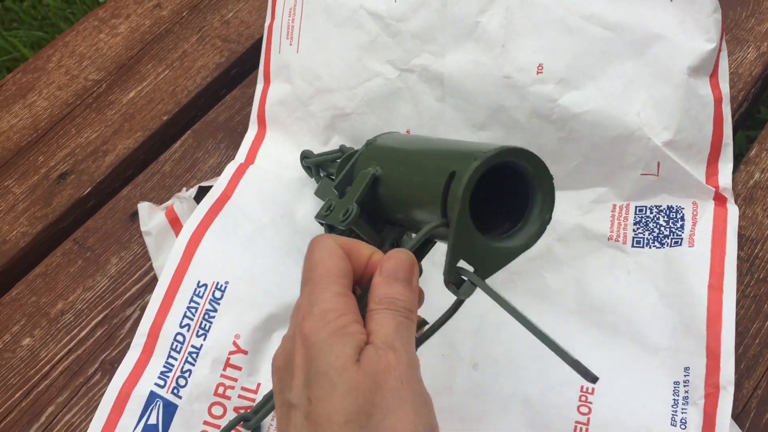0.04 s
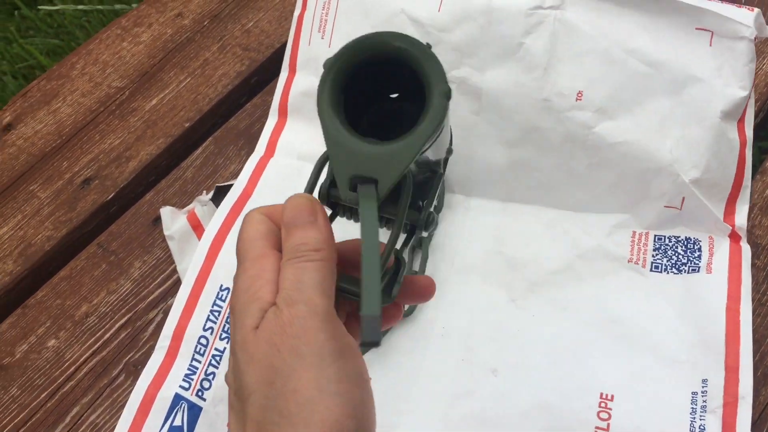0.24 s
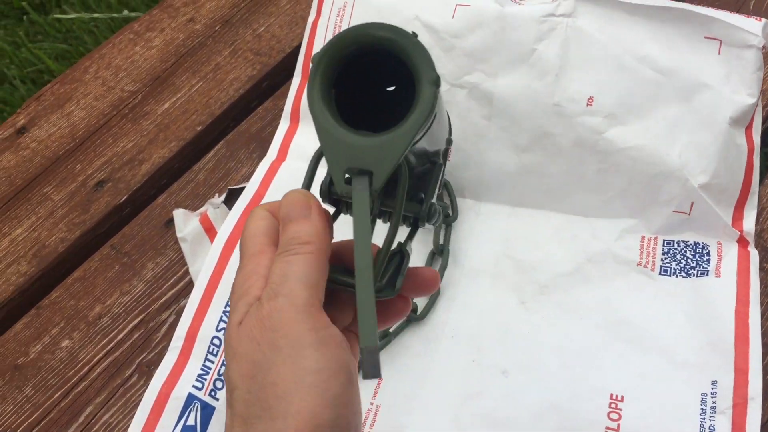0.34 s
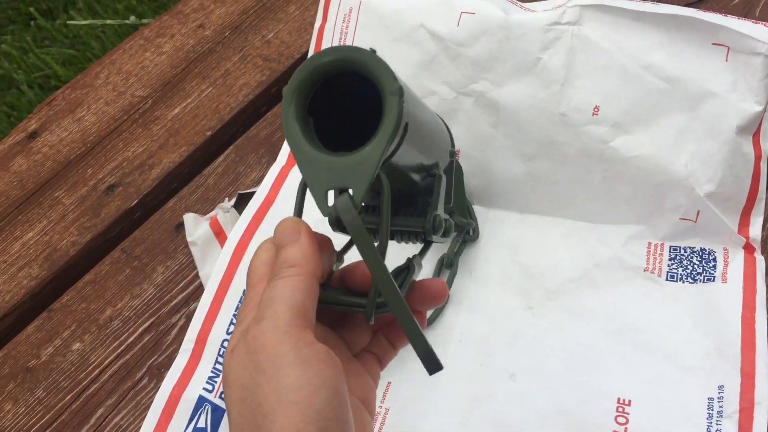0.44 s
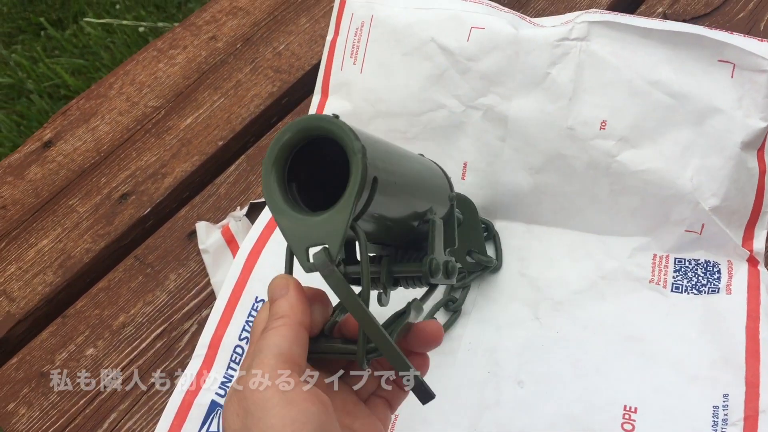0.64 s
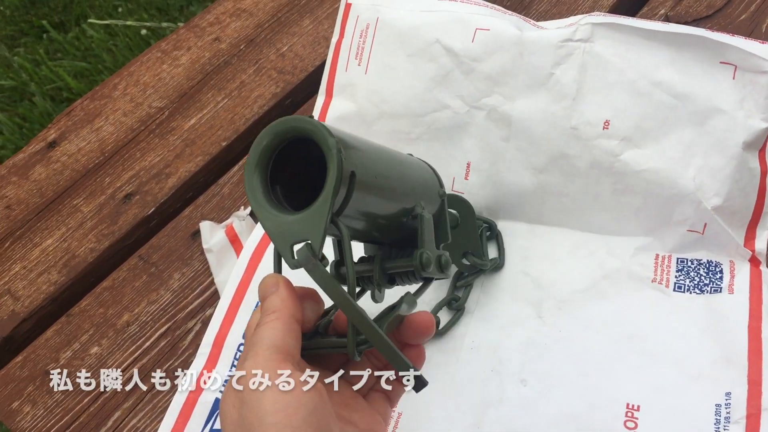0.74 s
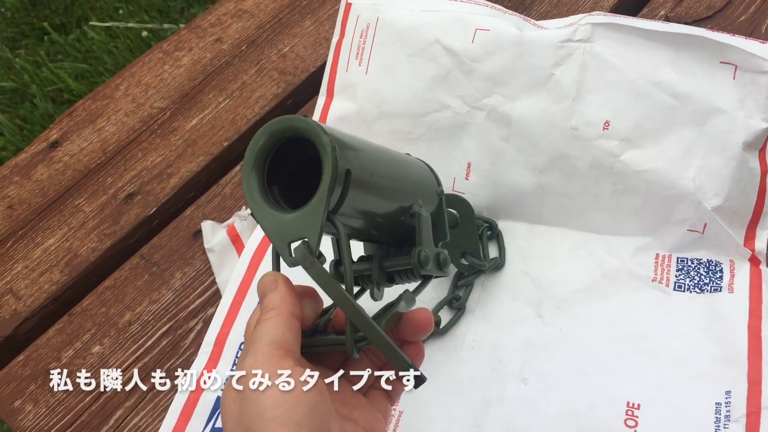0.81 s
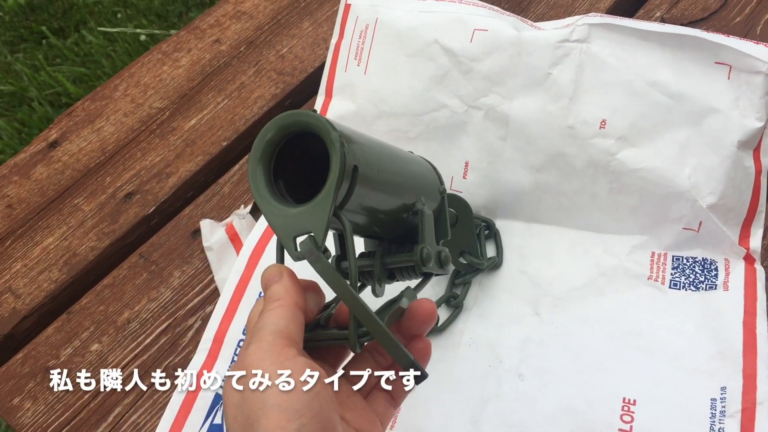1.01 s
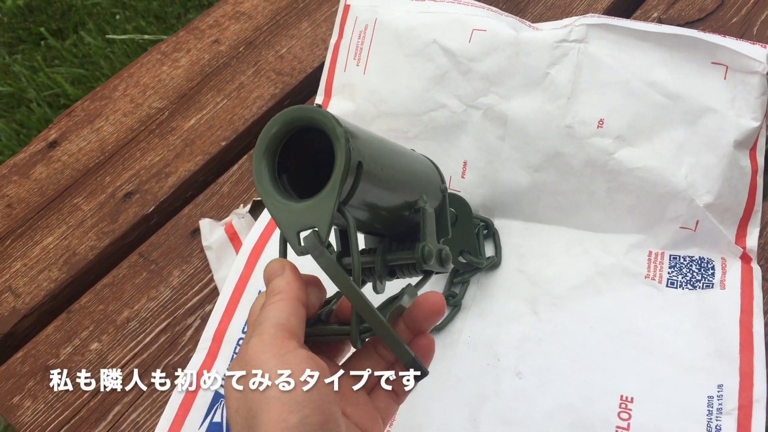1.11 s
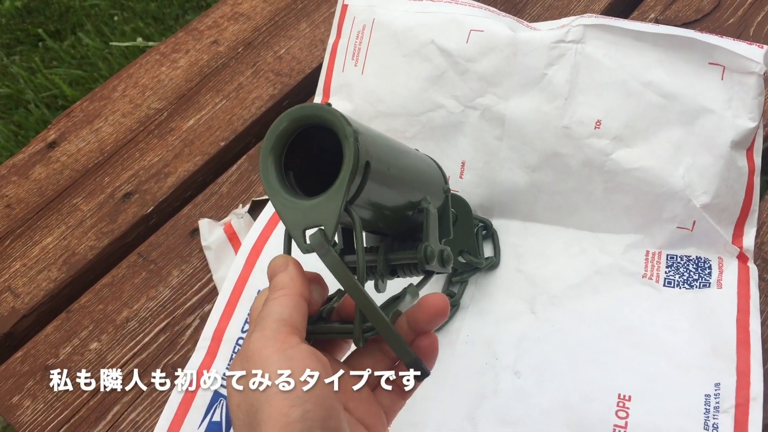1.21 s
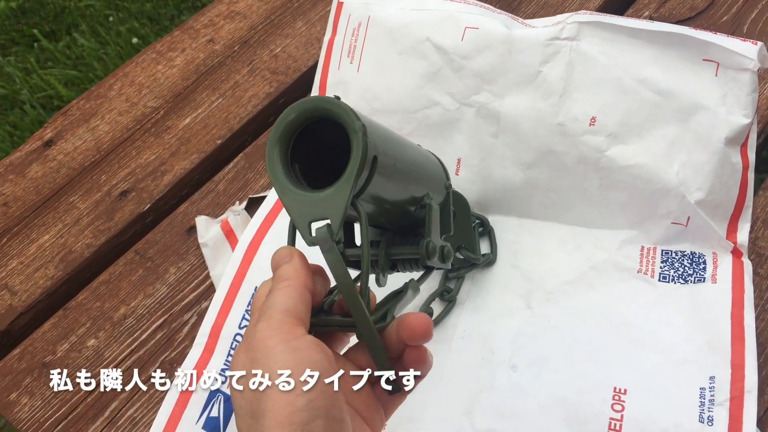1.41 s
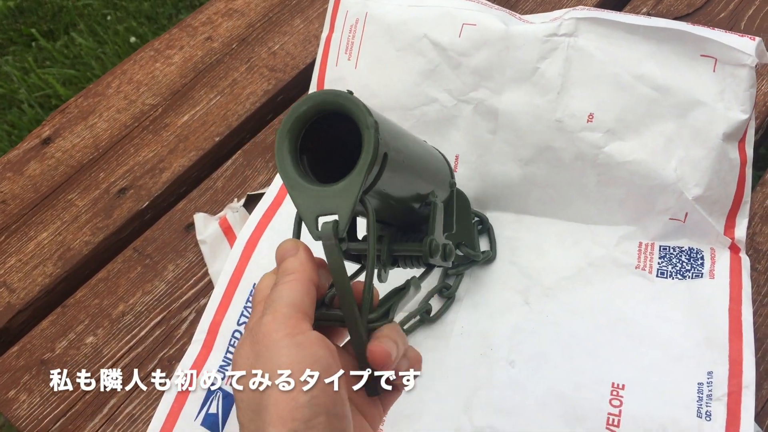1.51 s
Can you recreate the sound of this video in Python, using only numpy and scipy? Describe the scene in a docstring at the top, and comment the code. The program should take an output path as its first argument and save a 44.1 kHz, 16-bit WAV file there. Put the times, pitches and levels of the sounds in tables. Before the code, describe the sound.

Metal clinks from a handled steel trap, with a paper scrape and one bright ring.

```python
"""First comes a papery scrape: a hand turns a steel tube trap over on a paper mailer, on a wooden deck.
The trap knocks on the boards through the paper, and its chain and trigger lever rattle.
Its barrel is struck and rings clearly until setting the trap down chokes it.
Then the outdoors is left: a puff of wind, a faint hum and a far bird, before two small last clinks."""
import sys
import numpy as np
from scipy import signal
from scipy.fft import rfft, irfft
from scipy.io import wavfile
from scipy.ndimage import uniform_filter1d

SR = 44100
rng = np.random.default_rng(int(sys.argv[2]) if len(sys.argv) > 2 else 0)


def waveform_to_disk(signal):
    """Save audio, clipped to [-1, 1], as 16-bit WAV at the path in sys.argv[1]."""
    frames = np.transpose(np.atleast_2d(signal))
    scaled = np.clip(frames, -1, 1) * 32767
    samples = np.round(scaled).astype(np.int16)
    wavfile.write(sys.argv[1], SR, samples)


N = 68355
TIME = np.arange(N) / SR
TILT_PIVOT_HZ = 4000  # a positive tilt boosts pitches above this and softens those below


def amp(db):
    """Turns decibels into a number to multiply by."""
    return 10 ** (np.asarray(db) / 20)


def unit(x):
    """Scales a sound to an average (rms) size of 1."""
    return x / np.sqrt(np.mean(x ** 2) + 1e-20)


def curve(points):
    """Joins (time_s, value) points with straight lines."""
    return np.interp(TIME, *np.transpose(points))


def add(mix, start_s, sound):
    """Mixes a sound in at its start time."""
    part = mix[max(round(start_s * SR), 0):][:len(sound)]
    part += sound[:len(part)]


def coloured(x, colour, tilt_db=0):
    """Gives x a colour (how strong each pitch is), tilted by dB per octave, at size 1."""
    hz = np.fft.rfftfreq(len(x), 1 / SR) + 1
    points_hz, points_db = np.transpose(colour)
    shape_db = np.interp(np.log(hz), np.log(points_hz), points_db)
    shape_db += tilt_db * np.log2(np.maximum(hz, points_hz[0]) / TILT_PIVOT_HZ)
    return unit(irfft(rfft(x) * amp(shape_db), len(x)))


def dying(t, fade_s):
    """Fades by 60 dB in fade_s seconds."""
    return np.exp(-np.log(1000) * t / fade_s)


def crack(colour, fade_s, tick_share, tilt_db=0):
    """Rough surfaces meet: a bright tick holding tick_share of the energy, and a short noisy tail."""
    t = TIME[:SR // 8]
    ringing, roughness = rng.standard_normal((2, len(t)))
    tail = coloured(ringing, colour, tilt_db) * dying(t, fade_s)
    burst = coloured(roughness * (t < .0006), colour, tilt_db + 2.5)
    # keep the burst's colour but pack its energy at the very start (minimum phase)
    log_gain = np.log(abs(np.fft.fft(burst)) + 1e-9)
    tick = np.fft.ifft(np.exp(np.conj(signal.hilbert(log_gain)))).real
    tick *= np.linalg.norm(tail) / np.linalg.norm(tick)
    return np.sqrt(1 - tick_share) * tail + np.sqrt(tick_share) * tick


def strike(hit, tones, colour, crack_s, tick_share, detune=0):
    """One hit: a crack, plus the part's own tones, each off pitch by up to the fraction detune."""
    _, ring_db, crack_db, tilt_db, fade_factor = hit
    t = TIME[:SR // 2]
    out = np.zeros(len(t))
    for hz, db, fade_s in tones:
        phase, offset = rng.uniform(-.87, 1, 2)
        gain = amp(ring_db + db + tilt_db * np.log2(hz / TILT_PIVOT_HZ))  # tilt sets the brightness
        tone = np.sin(2 * np.pi * hz * (1 + detune * offset) * t + np.pi * phase)
        out += gain * dying(t, fade_s * fade_factor) * tone  # a gripped part fades sooner
    out *= np.minimum(t / .00041, 1)  # the ring takes a moment to build
    add(out, 0, amp(crack_db) * crack(colour, crack_s, tick_share, tilt_db))
    return out


def rattle(hits, tones, colour, **contact):
    """Strikes one part once for each row of hits."""
    out = np.zeros(N)
    for hit in hits:
        add(out, hit[0], strike(hit, tones, colour, **contact))
    return out


# the hush of still air: pitch_hz, relative_db
AIR_COLOUR = [(30, -15.5), (150, -2.5), (400, -1), (750, -9), (4000, -20.5), (14500, -29.5), (16000, -36.5)]
# puffs of wind: time_s, level_db
WIND_LEVELS = [(0, -73), (.05, -53.5), (.12, -74), (.22, -58), (.33, -78.5), (.74, -71.5), (.79, -57.5),
               (.845, -45.5), (.89, -50.5), (.95, -57.5), (1.0, -72.5), (1.2, -61), (1.35, -68), (1.5, -63)]
# the wind's rumble: pitch_hz, relative_db
WIND_COLOUR = [(25, -35), (45, 0), (75, -1.5), (140, -6.5), (210, -20.5), (400, -40.5), (1500, -69.5)]
def air_and_wind():
    """Still air hisses softly while the wind rumbles in puffs."""
    air, wind = rng.standard_normal((2, N))
    hush = amp(-71.5) * coloured(air, AIR_COLOUR)
    return hush + amp(curve(WIND_LEVELS)) * coloured(wind, WIND_COLOUR)


# the hum fading and swelling: time_s, level_db
HUM_LEVELS = [(0, -65.5), (1.05, -80.5), (1.12, -70.5), (1.23, -65), (1.28, -77.5)]
def far_hum(pitch_hz=590, waver=.008):
    """One distant tone whose pitch wanders a little."""
    drift = unit(uniform_filter1d(rng.standard_normal(N), size=900))
    hz = pitch_hz * (1 + waver * drift)
    return amp(curve(HUM_LEVELS)) * np.sin(2 * np.pi * np.cumsum(hz) / SR)


# the bird's note: time_s, pitch_hz
BIRD_NOTE = [(1.06, 3880), (1.09, 3200), (1.115, 3320), (1.145, 4510)]
def far_bird(level_db=-78):
    """A bird whistles one note that slides down, then up."""
    start_s, end_s = BIRD_NOTE[0][0], BIRD_NOTE[-1][0]
    progress = np.clip((TIME - start_s) / (end_s - start_s), 0, 1)
    swell = np.sqrt(abs(np.sin(np.pi * progress)))
    return amp(level_db) * swell * np.sin(2 * np.pi * np.cumsum(curve(BIRD_NOTE)) / SR)


# thuds of handling: time_s, level_db
THUD_LEVELS = [(0, -111), (.05, -59.5), (.17, -72.5), (.22, -49.5), (.29, -48.5), (.33, -61), (.37, -55.5),
               (.42, -76.5), (.52, -75), (.55, -63), (.64, -55), (.68, -74), (.75, -81)]
# their dull sound: pitch_hz, relative_db
THUD_COLOUR = [(30, -24), (70, -2.5), (170, -2), (280, -1), (500, -10.5), (1200, -34.5)]
def hand_thuds():
    """The hand and the mailer bump softly, making swells of low noise."""
    return coloured(rng.standard_normal(N), THUD_COLOUR) * amp(curve(THUD_LEVELS))


# the trap sliding: time_s, level_db
SLIDE_LEVELS = [(0, -61.5), (.035, -50.5), (.09, -55), (.18, -50.5), (.225, -45.5), (.28, -45), (.32, -53),
                (.46, -54.5), (.52, -53.5), (.6, -57.5), (.63, -50.5), (.66, -71.5), (.72, -79),
                (.85, -81.5)]
# its scratchy sound: pitch_hz, relative_db
SLIDE_COLOUR = [(60, -22), (300, -6), (720, -9.5), (1030, -1), (1560, -1), (2100, -6.5), (4000, -3.5),
                (6500, -10.5), (10000, -17.5), (16000, -22.5)]
def paper_slide(grains_per_s=1900, spread_db=1):
    """Sliding on paper makes many tiny clicks (grains) over a smooth hiss."""
    grains = (rng.random(N) < grains_per_s / SR) * rng.choice([-1, 1], N)
    sizes = amp(spread_db * np.minimum(rng.exponential(1, N), 4))
    scrape = unit(grains * sizes) + .37 * rng.standard_normal(N)
    return coloured(scrape, SLIDE_COLOUR) * amp(curve(SLIDE_LEVELS))


# steel rubbing the mailer: time_s, level_db
RUB_LEVELS = [(0, -64.5), (.055, -54), (.09, -56), (.12, -50.5), (.17, -58), (.21, -75)]
# where the rub is strongest: pitch_hz, width_hz, relative_db
RUB_PEAKS = [(1046, 290, -6.5), (1540, 240, -3)]
def paper_rub():
    """Steel dragged over the tight mailer rasps around two pitches."""
    friction = rng.standard_normal(N)
    rasp = np.zeros(N)
    for hz, width_hz, db in RUB_PEAKS:
        band = signal.iirpeak(hz, hz / width_hz, fs=SR)
        rasp += amp(db) * unit(signal.filtfilt(*band, friction))
    return unit(rasp) * amp(curve(RUB_LEVELS)) * (TIME < RUB_LEVELS[-1][0])


# creases snapping: start_s, level_db, pitch_hz
SNAPS = [(.0365, -46, 3000), (.0655, -48, 3050), (.103, -48, 3050), (.1395, -39, 3800)]
# a snap's crack: pitch_hz, relative_db
SNAP_COLOUR = [(500, -31), (1500, -3), (3700, 1), (7000, 1), (16000, -39)]
def paper_snaps(fade_s=.015):
    """Each crease gives way with a crack and a very short tone."""
    out = np.zeros(N)
    for start_s, db, hz in SNAPS:
        add(out, start_s, amp(db) * crack(SNAP_COLOUR, fade_s, tick_share=.58))
        add(out, start_s, amp(db) * dying(TIME, fade_s) * np.sin(2 * np.pi * hz * TIME))
    return out


def echoes(x, level_db=-14, fade_s=.11, delay_s=.003, bounces_per_s=2000):
    """Sound bounces briefly off the deck and the things around it."""
    t = TIME[:SR // 3]
    bounces = rng.standard_normal(len(t)) * (rng.random(len(t)) < bounces_per_s / SR)
    tail = bounces * dying(t, fade_s) * (t > delay_s)
    return amp(level_db) * signal.fftconvolve(x, tail / np.linalg.norm(tail))[:N]


# the boards' tones: pitch_hz, relative_db, fade_s
DECK_TONES = [(322, -14, 0.039), (659.5, -15, 0.049), (1174, -4, 0.033), (1580, -5, 0.037),
              (2510, -5.5, 0.024)]
# a knock's crack: pitch_hz, relative_db
DECK_CRACK = [(80, -22.5), (400, -10), (1400, 7), (2000, -3.5), (2700, -1), (4200, -7.5), (6000, -15.5),
              (16000, -38)]
# knocks: start_s, ring_db, crack_db, tilt_db_per_octave, fade_factor
DECK_HITS = [(.1892, -32, -29, 0.5, 1.5), (.198, -34, -47, 2.5, 1.6), (.2095, -40, -35, -6.5, 0.3),
             (.2201, -34.5, -27.5, 1.5, .5), (.2441, -29, -32.5, 1, 0.32), (.352, -44.5, -39, -0.5, 2.2),
             (.564, -41, -44, 0, 1.2), (.5715, -38, -36, -3, .4), (.6178, -64, -39, 2.5, 0.85),
             (.703, -62.5, -58, 0, 1.9), (.777, -64, -62.5, -1, .6), (1.3195, -63.5, -58.5, -2, 1.22),
             (1.324, -63.5, -57.5, -7.5, 1.1)]
def deck_knocks():
    """The trap knocks on the wooden boards through the paper."""
    return rattle(DECK_HITS, DECK_TONES, DECK_CRACK, crack_s=.03, tick_share=.22, detune=.075)


# a link's tones: pitch_hz, relative_db, fade_s
LINK_TONES = [(4219, 2.5, 0.054), (4110, -6.5, 0.057), (8106, -3.5, 0.059), (8825, -3, .055),
              (13930, -16.5, .02)]
# the swivel's tones: pitch_hz, relative_db, fade_s
SWIVEL_TONES = [(7500, 0, 0.08), (8340, -6.5, .09)]
# the crack of either: pitch_hz, relative_db
CHAIN_CRACK = [(300, -17.5), (1500, -9), (3800, 1), (8800, -0.5), (14000, -1.5), (16000, -13.5)]
# link clinks: start_s, ring_db, crack_db, tilt_db_per_octave, fade_factor
LINK_HITS = [(.2235, -38.5, -44, -5, 1), (.2525, -32, -32, 6.5, 0.98), (.2630, -23.5, -26, -2, 0.7),
             (.268, -34, -36, -8, 0.38), (.3382, -42, -48, -1.5, 0.8), (.352, -43, -52, -1.5, 0.85),
             (.3555, -34.5, -41, -8, 0.75), (.3645, -42, -54.5, -3.5, 1), (.556, -40.5, -41, -5.5, 0.64),
             (.5645, -38, -57, 1, 1)]
# the swivel's tinkle: start_s, ring_db, crack_db, tilt_db_per_octave, fade_factor
SWIVEL_HITS = [(.439, -40.5, -41.5, 0.5, .6)]
def chain():
    """Links clink together, each a little off pitch, and a small swivel tinkles once."""
    contact = dict(crack_s=.023, tick_share=.26)
    links = rattle(LINK_HITS, LINK_TONES, CHAIN_CRACK, detune=.018, **contact)
    return links + rattle(SWIVEL_HITS, SWIVEL_TONES, CHAIN_CRACK, **contact)


# the lever's tones: pitch_hz, relative_db, fade_s
LEVER_TONES = [(2809, -2, 0.057), (4070, -1, 0.11), (4300, -2, 0.049), (5380, -7.5, 0.04),
               (7266, -5.5, .05), (8220, -10.5, 0.044), (9500, -5.5, .025)]
# its crack: pitch_hz, relative_db
LEVER_CRACK = [(300, -18), (1200, -11), (2600, -4.5), (5500, 6), (9000, -0.5), (12000, -3.5), (16000, -7.5)]
# its taps: start_s, ring_db, crack_db, tilt_db_per_octave, fade_factor
LEVER_HITS = [(.385, -39, -30, -3.5, 1.7), (0.4037, -36.5, -38, 1, 0.98), (.413, -33, -38.5, 0, 0.48),
              (.419, -39, -39.5, 1.5, 0.54), (0.451, -44.5, -46.5, -5, 0.4)]
def lever():
    """The trigger lever rattles in a quick run of taps."""
    return rattle(LEVER_HITS, LEVER_TONES, LEVER_CRACK, crack_s=.022, tick_share=.12, detune=.015)


def loose_links(hits, low_hz=5500, high_hz=14000, max_lag_s=.014, fade_s=.035, relative_db=-13.5):
    """Each hit shakes three nearby links, which ping at their own pitches just after it."""
    out, t = np.zeros(N), TIME[:SR // 8]
    for start_s, ring_db, *_ in hits:
        for height, lag in rng.random((3, 2)):
            hz = low_hz * (high_hz / low_hz) ** height
            ping = dying(t, fade_s) * np.sin(2 * np.pi * hz * t)
            add(out, start_s + lag * max_lag_s, amp(ring_db + relative_db) * ping)
    return out


# the catch's tones: pitch_hz, relative_db, fade_s
CATCH_TONES = [(1027, -20.5, 0.1), (2488, -3, 0.057), (2820, -8, 0.041), (3928, -3.5, 0.044),
               (4220, -6, 0.024), (5290, -9, 0.025), (7750, -11, 0.019), (8240, 3.5, 0.04)]
# its crack: pitch_hz, relative_db
CATCH_CRACK = [(300, -28.5), (1200, 1.5), (1900, -20), (2600, -3.5), (4200, 8), (6000, -7), (7200, 7),
               (10000, -10), (16000, -4.5)]
# its taps: start_s, ring_db, crack_db, tilt_db_per_octave, fade_factor
CATCH_HITS = [(1.4115, -53.5, -54.5, -4.5, 1), (1.4507, -38.5, -41, -1, 0.72),
              (1.4535, -43, -38, 8.5, 0.97)]
def catch():
    """The trap's catch taps, then drops into place: the last clinks."""
    return rattle(CATCH_HITS, CATCH_TONES, CATCH_CRACK, crack_s=.022, tick_share=.04)


# the steel barrel's tones: pitch_hz, relative_db, fade_s
BARREL_TONES = [(3905, -13.5, .03), (5360, -38, .16), (7892, -26, .6), (8146, -15, .085), (8917, -35, .13),
                (11320, -34, .09), (12600, -35, .34), (15295, -28, .18)]
# its crack: pitch_hz, relative_db
BARREL_CRACK = [(100, -43), (1000, -5.5), (1600, -21), (2300, -10.5), (3300, -8), (3900, -1), (4800, -0.5),
                (6000, -13), (8400, 4), (10500, -5.5), (12300, -9), (14500, -2), (16000, -7.5)]
# one loud blow, one faint: start_s, ring_db, crack_db, tilt_db_per_octave, fade_factor
BARREL_HITS = [(0.4883, -4, -15.5, 2, 0.88), (1.4501, -39.5, -59, 9.5, 0.77)]
def barrel(set_down_s=.566, drop_db=7, choke_db_per_s=270, dull_above_hz=11000):
    """The tube rings high and clear; touching down chokes the ring, the highest tones most."""
    out = np.zeros(N)
    treble_cut = signal.butter(4, dull_above_hz, fs=SR, output="sos")
    for hit in BARREL_HITS:
        start_s = hit[0]
        ring = strike(hit, BARREL_TONES, BARREL_CRACK, crack_s=.032, tick_share=.08)
        if start_s < set_down_s:
            resting_s = np.maximum(start_s + TIME[:len(ring)] - set_down_s, 0)
            touch = np.minimum(resting_s / .011, 1)  # 0 in the air, 1 fully down
            choked = signal.sosfiltfilt(treble_cut, ring) * amp(-drop_db - choke_db_per_s * resting_s)
            ring = (1 - touch) * ring + touch * choked
        add(out, start_s, ring)
    return out


def scene():
    """Mixes the trap with its echoes, the paper and the outdoors into one channel."""
    trap = chain() + lever() + catch() + deck_knocks() + barrel() + loose_links(LINK_HITS + LEVER_HITS)
    trap += echoes(trap)
    paper = paper_slide() + paper_snaps() + hand_thuds() + paper_rub()
    outdoors = air_and_wind() + far_hum() + far_bird()
    return (trap + paper + outdoors)[None]


def record(dry):
    """Cuts the very highest treble, above 15850 Hz."""
    treble_cut = signal.firwin(255, 15850, window=("kaiser", 9), fs=SR)
    return signal.oaconvolve(dry, treble_cut[None], "same")


dry = scene()
out = record(dry)
waveform_to_disk(out)
```